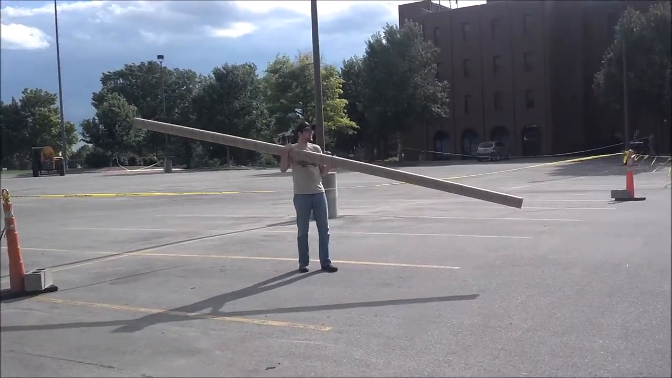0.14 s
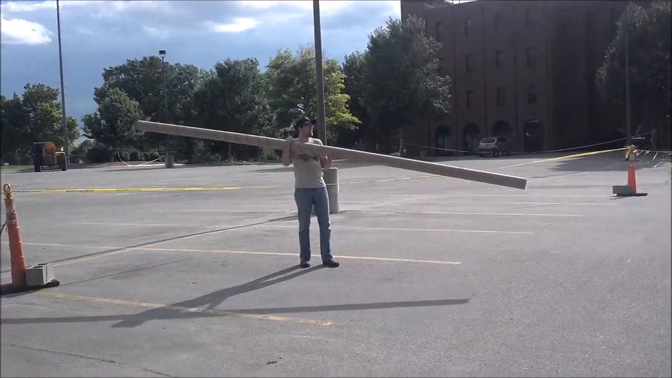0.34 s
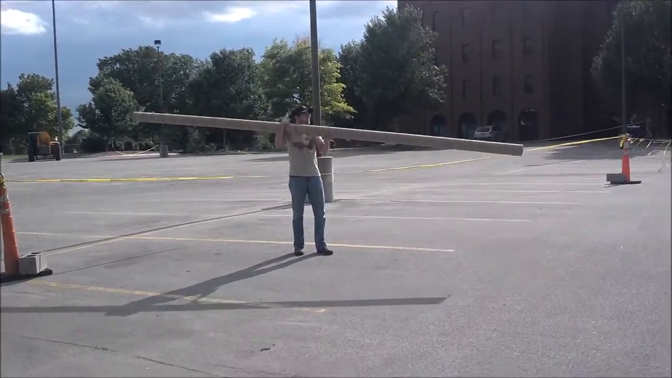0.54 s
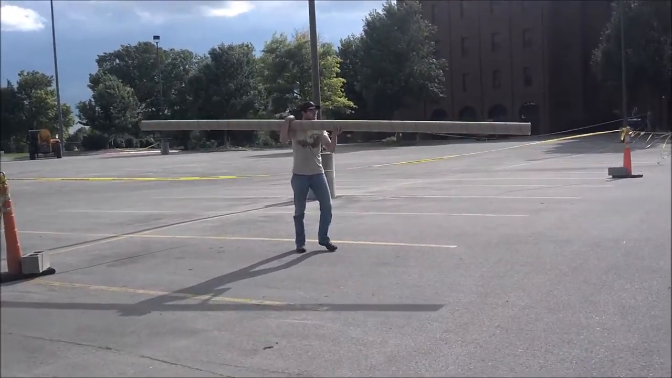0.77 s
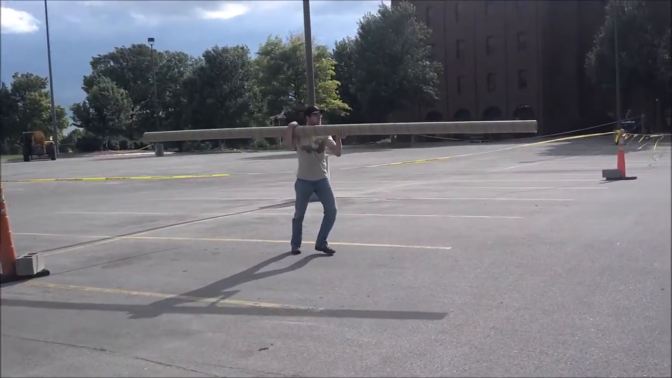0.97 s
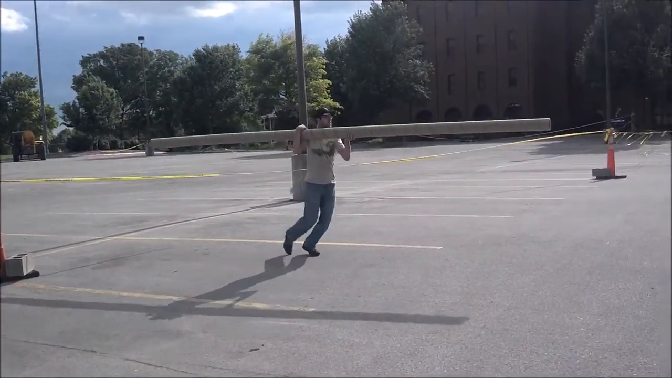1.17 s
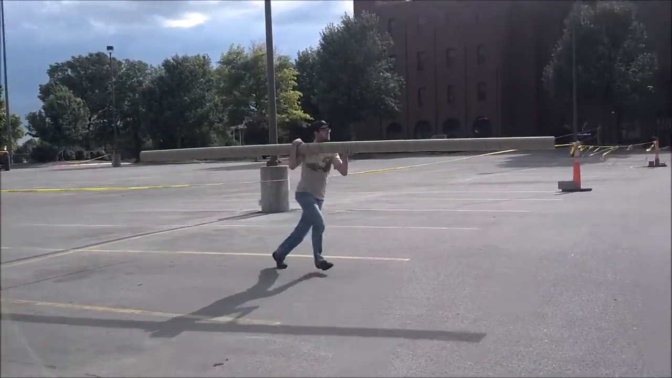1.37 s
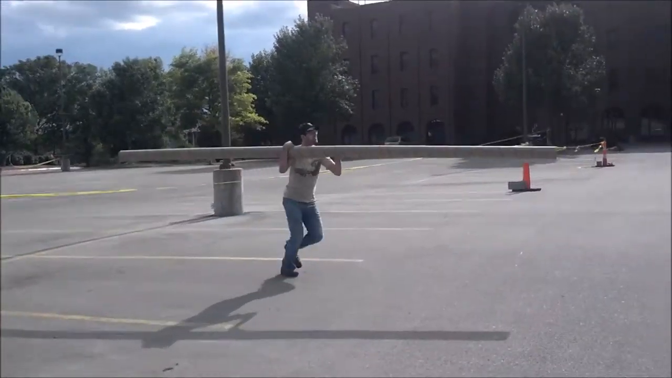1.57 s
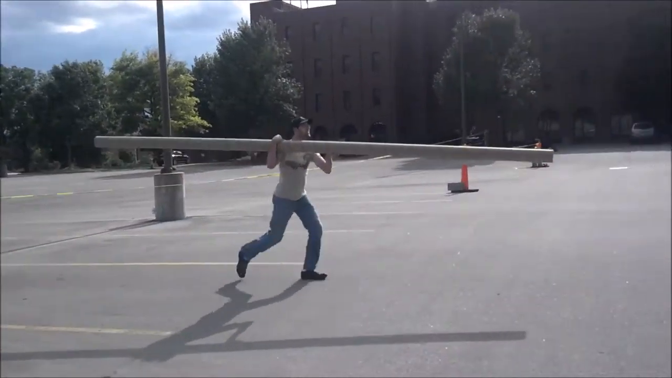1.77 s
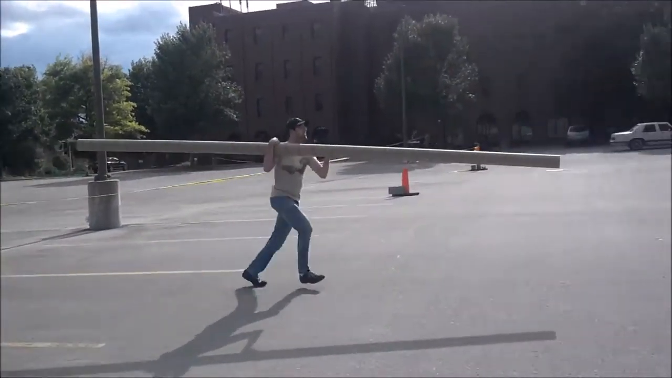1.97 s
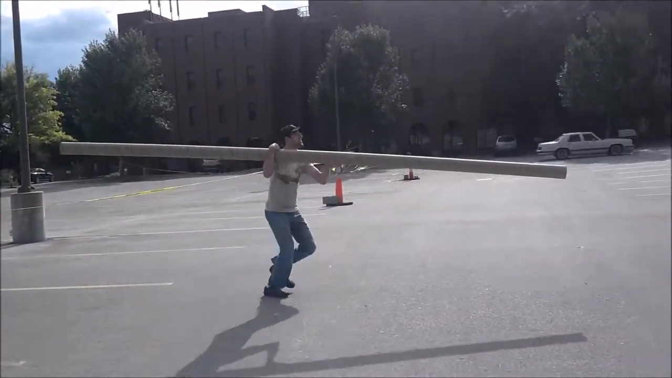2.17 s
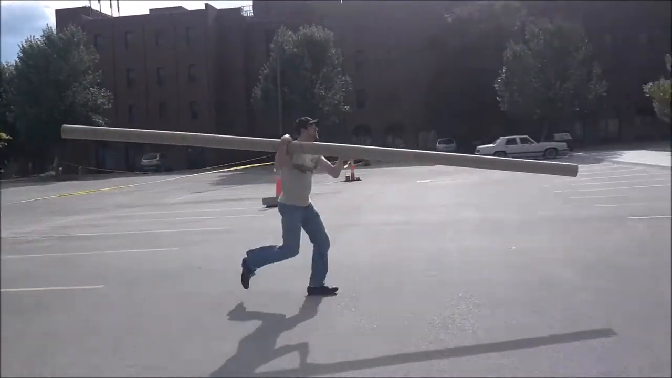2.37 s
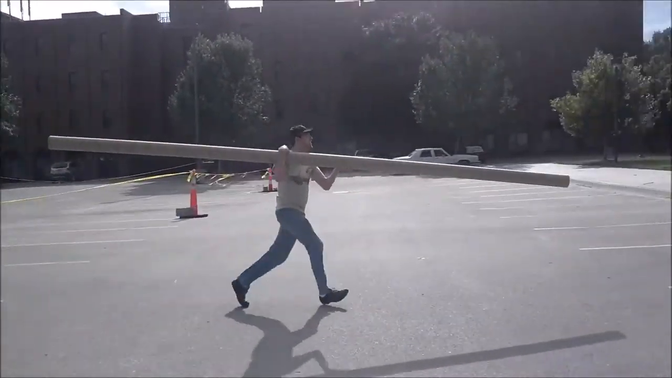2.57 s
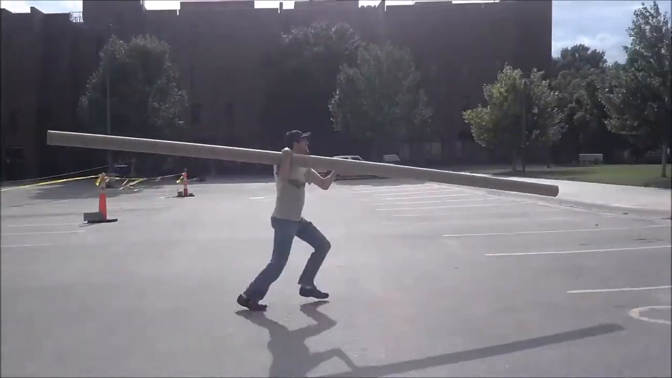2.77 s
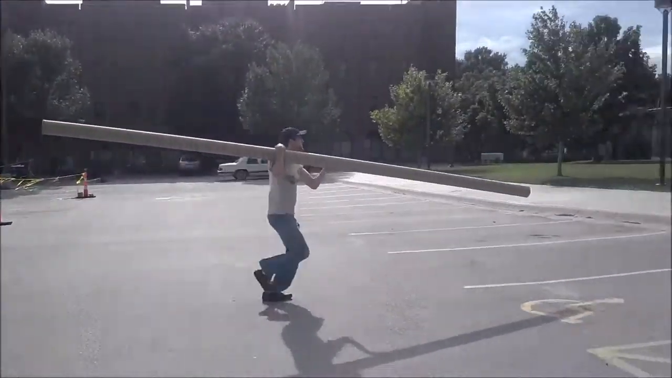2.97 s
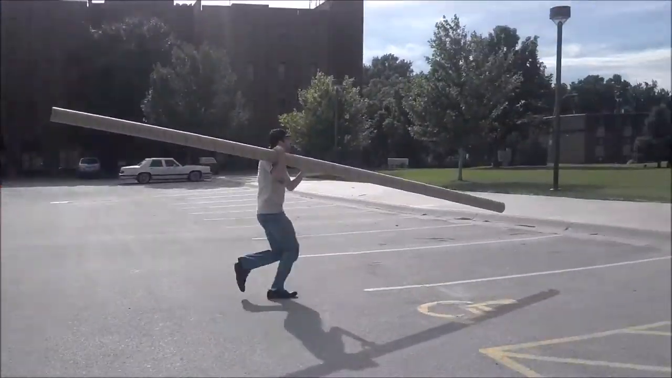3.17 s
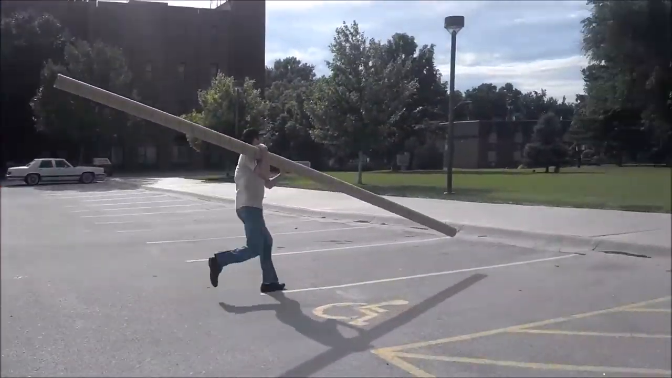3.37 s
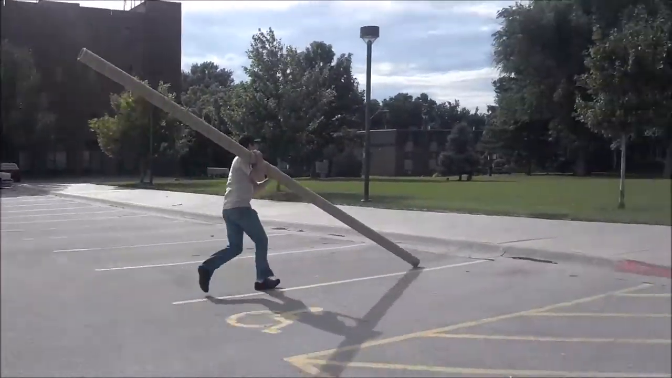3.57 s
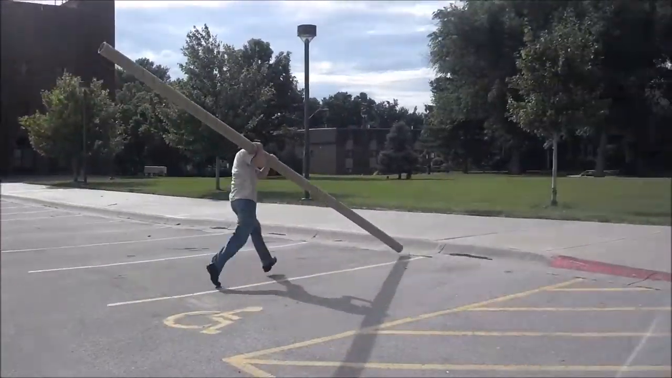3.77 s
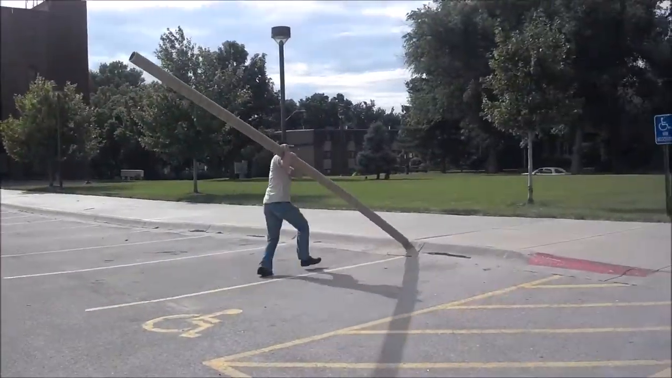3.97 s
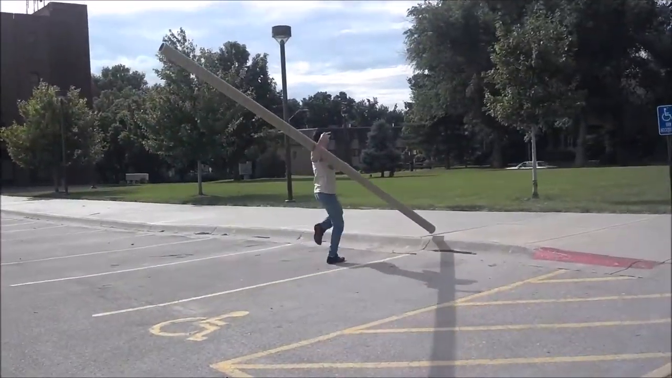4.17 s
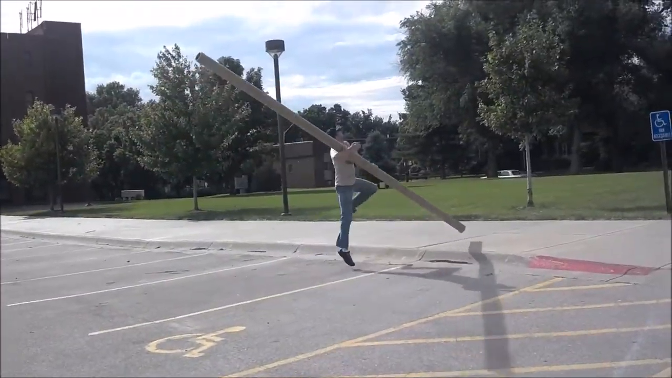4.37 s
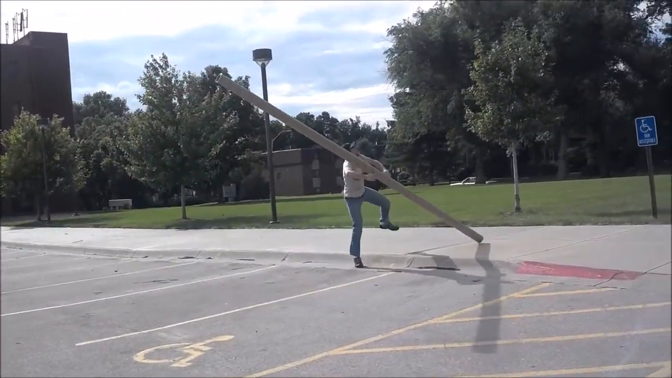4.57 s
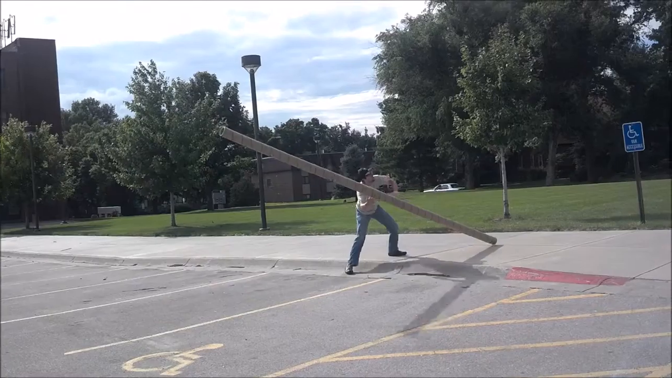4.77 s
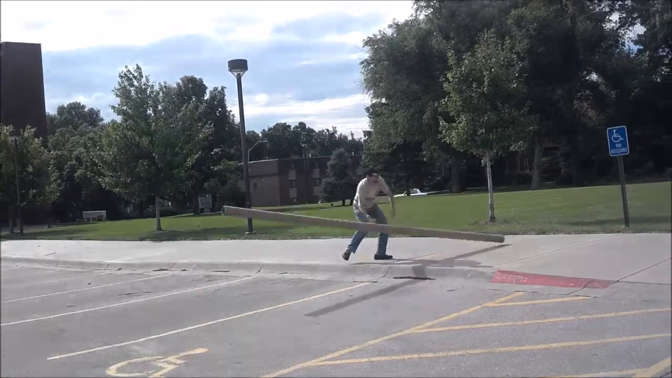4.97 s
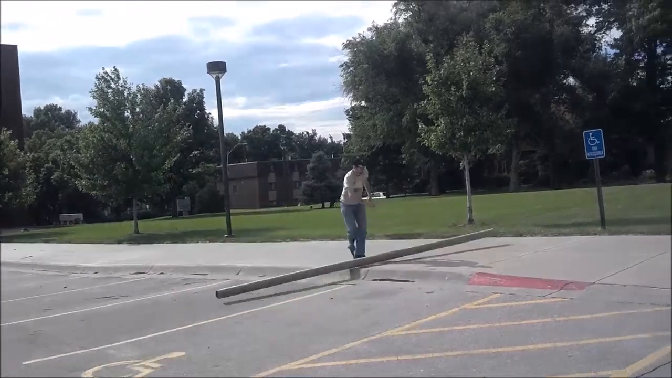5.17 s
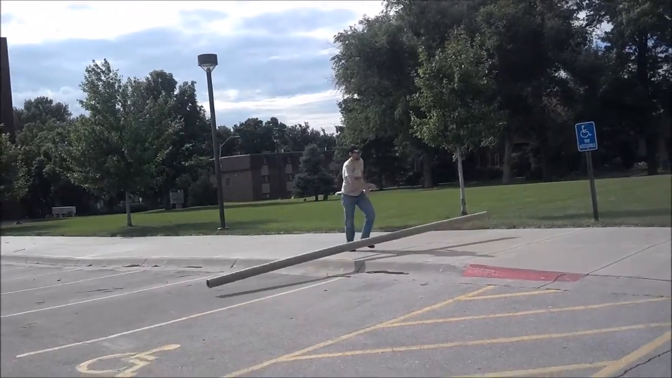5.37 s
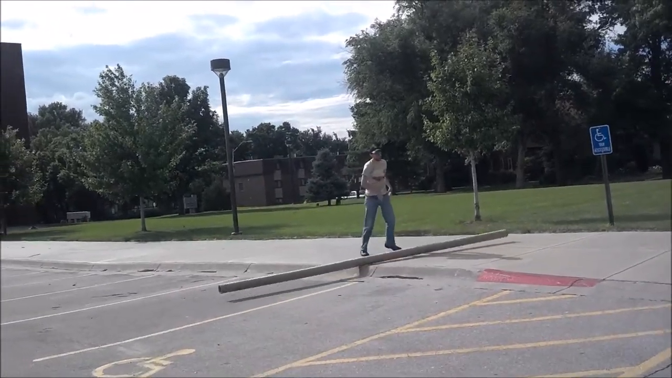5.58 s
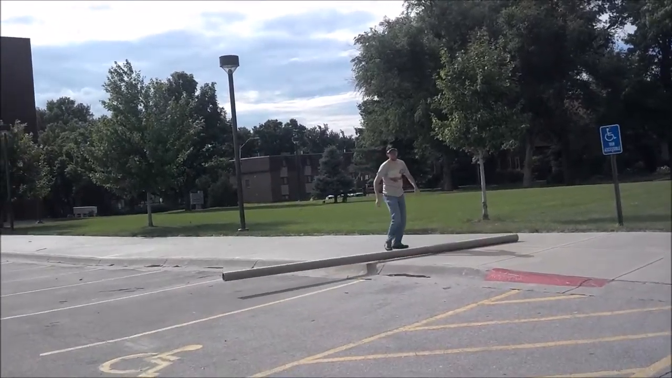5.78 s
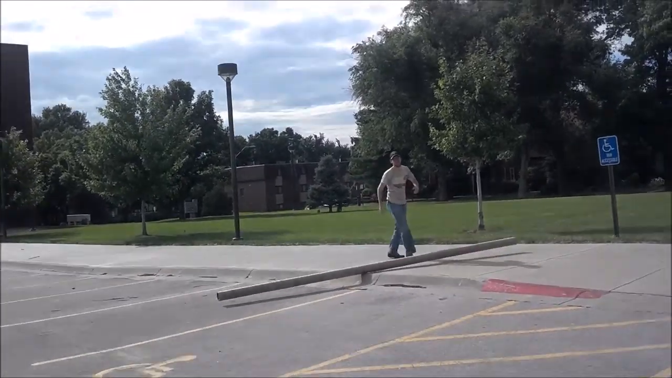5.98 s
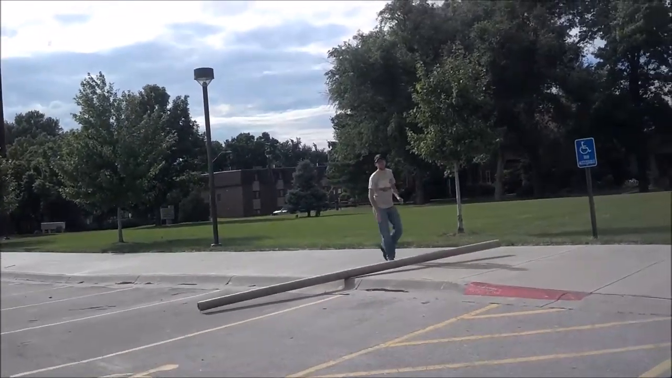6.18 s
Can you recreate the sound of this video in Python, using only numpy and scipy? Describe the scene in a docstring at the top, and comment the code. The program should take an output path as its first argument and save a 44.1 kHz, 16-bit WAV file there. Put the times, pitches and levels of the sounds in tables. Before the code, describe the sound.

A dry, open car park with wind on a stereo microphone: lumpy low rumble and soft thumps, often heavier on the right, over faint traffic, thin leaf hiss and barely audible bird chirps near 0.2, 0.8 and 2 s. At 1.0 s a bright snap clicks close on the left, and the background briefly dips. Faint gritty running steps follow around 1.6-1.8 s and 2.6-3.4 s, with strong wind buffets near 3.5 s. At 3.6 s the wooden pole tip stutters on asphalt, four quick hollow knocks with a short scrape; a hard clack lands at 3.95 s, smaller taps at 4.15 s. More skidding knocks come at 4.55 s and weaker ones at 4.8-4.9 s. Around 5.1 s it clatters into the loudest, clipped bang at 5.18 s. Rocking knocks at 5.7 and 5.84 s finish, with a gust near 6 s.

```python
"""Open car park, windy: a long wooden pole is carried past at a run and its tip skips and scrapes on the asphalt,
then it falls and rocks on a kerb. Wood is struck and dragged modes plus noise; shoes and ticks are noise puffs.
Gusts rumble on the two microphone ports, each on its own, over far traffic, leaf hiss and a faint bird.
The recorder steers the ports: each side subtracts a delayed copy of the other port."""
import sys
import numpy as np
from scipy import signal
from scipy.fft import rfft, irfft
from scipy.io import wavfile
from scipy.ndimage import map_coordinates

SR = 44100
rng = np.random.default_rng(int(sys.argv[2]) if len(sys.argv) > 2 else 0)


def store_pcm(level_fs):
    """Save levels as 16-bit WAV."""
    pcm = np.round(np.clip(level_fs, -1, 1) * 32767).astype(np.int16)
    wavfile.write(sys.argv[1], SR, np.atleast_2d(pcm).T)


N = 275095


def from_db(db):
    """Gain of a level in dB."""
    return 10 ** (np.asarray(db) / 20)


def rms_one(x):
    """Scaled to rms 1."""
    return x / np.sqrt(np.mean(x ** 2) + 1e-20)


def in_time(rows):
    """Columns of a curve, interpolated at every sample."""
    s, *columns = np.transpose(rows)
    return [np.interp(np.arange(N) / SR, s, column) for column in columns]


def band(x, low_hz, high_hz, order=2):
    """Butterworth band-pass; the upper edge is held below 0.45 SR."""
    return signal.sosfilt(signal.butter(order, [low_hz, min(high_hz, .45 * SR)], "band", fs=SR, output="sos"), x)


def drift(rate_hz):
    """Slow random wander of rms 1: noise through two equal low-pass poles at an eighth of the sample rate."""
    r = np.exp(-16 * np.pi * rate_hz / SR)
    noise = rng.standard_normal(N // 8 + 2002)
    slow = signal.lfilter([1], [1, -2 * r, r * r], noise)[2000:]  # the filter has settled by then
    return np.interp(np.arange(N) / 8, np.arange(len(slow)), rms_one(slow))


def ring(clicks, hz, t60):
    """Two-pole resonator: a unit click starts a sine of height near 1 that loses 60 dB in t60 seconds."""
    r, w = from_db(-60 / (t60 * SR)), 2 * np.pi * hz / SR
    return signal.lfilter([0, np.sin(w)], [1, -2 * r * np.cos(w), r * r], clicks + 1e-18)


def add(out, s, piece):
    """Mixes a short sound in at time s."""
    i = round(s * SR)
    out[i:i + len(piece)] += piece[:N - i]


def puff(t60, low_hz, high_hz, size=4000):
    """A dying burst of band noise, scaled by its bandwidth to a peak near 1."""
    dying = from_db(-60 * np.arange(size) / SR / t60)
    burst = band(rng.standard_normal(size) * dying, low_hz, high_hz)
    return burst / np.sqrt(8 * (high_hz - low_hz) / SR)


def coloured(spectrum, alike):
    """Noise at both ports with a given spectrum, the share alike of its power in common; rms 1."""
    hz, level_db = np.transpose(spectrum)
    log_hz = np.log(np.fft.rfftfreq(N, 1 / SR) + 1)
    shape = from_db(np.interp(log_hz, np.log(hz), level_db, -60, -60))
    shared, left, right = irfft(rfft(rng.standard_normal((3, N))) * shape, N)
    return rms_one(np.sqrt(alike) * shared + np.sqrt(1 - alike) * np.array([left, right]))


# Pole tip dragged on asphalt: (time [s], length [s], first level [dB], last level [dB],
#   grit relative [dB], upper modes relative [dB])
DRAGS = [(3.611, 0.032, -14.5, -27.5, -17, -11.5), (3.667, 0.042, -24.5, -36, -11.5, -10.5),
         (3.924, 0.026, -31.5, -33.5, -4, 3), (3.95, 0.0099, -29.5, -17.5, -6.5, -5.5),
         (4.016, 0.018, -41, -37, -11.5, -18), (4.147, 0.0064, -22, -46, -12.5, 0),
         (4.172, 0.0053, -29, -29, -26, -7.5), (4.542, 0.031, -33.5, -34.5, -4, 5.5),
         (4.596, 0.039, -26.5, -45.5, -9, -1), (4.788, 0.0056, -41, -52, -30, -2),
         (4.852, 0.031, -29.5, -44, -3, 4.5), (4.91, 0.076, -34.5, -49, -3, -4),
         (5.105, 0.073, -34, -31, -7, -9), (5.198, .025, -25, -38.5, -29, -23),
         (5.565, 0.018, -48.5, -38, -26, -25)]
LAND_DB_PER_S, LIFT_DB_PER_S = 3507, 1098  # how fast a skid starts and dies away
GRIT_FOLLOWS = 0.61  # share of a skid's fade that the grit follows


def skid_gains():
    """Gains of lower modes, upper modes and grit: each skid lands, drags and lifts; the tip bites unevenly."""
    gains, t = np.zeros((3, N)), np.arange(N) / SR
    for s, length_s, first_db, last_db, grit_db, upper_db in DRAGS:
        fade_db = np.interp(t, [s, s + length_s], [0, last_db - first_db])
        landing_db = LAND_DB_PER_S * np.maximum(s - t, 0)
        lifting_db = LIFT_DB_PER_S * np.maximum(t - s - length_s, 0)
        layers_db = [fade_db, fade_db + upper_db, GRIT_FOLLOWS * fade_db + grit_db]
        gains += from_db(first_db - landing_db - lifting_db + layers_db)
    return from_db(2.6 * drift(98) - 1.0) * gains


# Modes of the wooden pole: (frequency [Hz], level [dB], ring time to -60 dB [s])
POLE_MODES = [(331, -6, 0.054), (570, -9, 0.022), (719, -1, 0.036), (882, -3, 0.05), (970, -0.5, 0.04),
              (1080, 1.5, .035), (1157, -1, .035), (1274, -2, 0.03), (1450, -6, 0.012), (1813, -2, 0.018),
              (1965, 0.5, 0.02), (2323, -1.5, 0.013), (2685, -1.5, 0.015), (3650, -9, .014)]
CATCHES_PER_S, CATCH_SPREAD_DB = 600, 5


def skids(lower_gain, upper_gain):
    """Uneven catches of the tip ring the pole's modes; each catch strikes every mode differently."""
    body = np.zeros((2, N))
    caught = rng.random(N) < CATCHES_PER_S / SR
    catches = caught * from_db(CATCH_SPREAD_DB * np.minimum(rng.exponential(1, N), 3))
    for hz, level_db, t60 in POLE_MODES:
        mode = rms_one(ring(catches * rng.standard_normal(N), hz, t60))
        body[int(hz > 1500)] += from_db(.3 * level_db) * mode  # dragging evens out the mode levels
    lower, upper = rms_one(body[0]), rms_one(body[1])
    return lower_gain * from_db(-10.5) * lower + upper_gain * from_db(3.5) * upper


def grit(gain):
    """Crushed grains along the stroke: random clicks in two bands; each port hears its own crackle."""
    sizes = from_db(2.5 * np.minimum(rng.exponential(1, (2, N)), 5))
    grains = rng.standard_normal((2, N)) * sizes * (rng.random((2, N)) < 9000 / SR)  # 9000 per second
    middle = rms_one(band(grains, 2900, 4600, order=1))
    top = rms_one(band(grains, 5600, 24000))
    return gain * from_db(-2.5) * rms_one(middle + from_db(-7.0) * top)


# Blows on the pole: (time [s], level [dB], crack relative [dB], ring relative [dB], tilt [dB per octave])
BLOWS = [(3.612, -12.5, -16, -18, 2.5), (3.639, -10.5, -16.5, -21, -2.5), (3.668, -13, -24, -35, -0.5),
         (3.7, -13, -23, -23.5, 1), (3.923, -17, -13, -36, -1), (3.949, -0.5, -34, -58, -1),
         (3.956, -14, -30, -28, 1.5), (3.962, -10.5, -22, -11.5, 4), (4.032, -30.5, -8, -11, -2.5),
         (4.144, -18, -27, -33, 0), (4.177, -15, -19, -28, -1), (4.541, -13.5, -14, -17, -0.5),
         (4.571, -17.5, -14, -14.5, -2), (4.601, -19.5, -15, -10.5, -2), (4.788, -30.5, -33, -11.5, -13),
         (4.853, -19, -25, -19, 0), (4.911, -26.5, -15, -11.5, -2), (5.108, -18, -9.5, -28, 4.5),
         (5.142, -16, -13.5, -27.5, -6), (5.163, -14.5, -18.5, -16.5, -2), (5.181, 5, -16, -22, 1),
         (5.193, -30, -28, -30, -13), (5.212, -18, -18.5, -14.5, -2), (5.57, -38.5, -21, -10.5, -11.5),
         (5.631, -30.5, -37, -11.5, -8.5), (5.683, -10.5, -15.5, -12.5, 3), (5.755, -21, -29, -16, -1),
         (5.839, -9, -47, -23.5, -2.5)]


def knocks():
    """Each blow: a short thud, a low thump, a rattle and the modes, each struck with its own strength."""
    out, click = np.zeros(N), np.eye(1, 4000)[0]
    spread_db = rng.normal(0, 2.5, (len(BLOWS), len(POLE_MODES)))
    detune = rng.normal(1, .025, spread_db.shape)  # the grip on the ground shifts each mode a little
    t = np.arange(4000) / SR
    for (s, level_db, _, ring_db, tilt_db), own_db, shift in zip(BLOWS, spread_db, detune):
        thud_hz = 1250 * from_db(0.62 * tilt_db)  # softer contact, lower thud
        thud = np.sin(2 * np.pi * thud_hz * t) * np.exp(-((t - .0012) / 0.0025) ** 2)
        thump = puff(0.07, 120, 520)  # low weight of the blow
        modes = np.zeros(4000)
        for k, (hz, mode_db, t60) in enumerate(POLE_MODES):
            strength = from_db(mode_db + own_db[k] + tilt_db * np.log2(hz / 1000))
            modes += (-1) ** k * strength * ring(click, hz * shift[k], t60)
        rattle = from_db(-6.5 + tilt_db) * puff(0.06, 500, 1940)  # the pole chatters on loose stones
        blow = from_db(-14.0) * thud + from_db(-22.5) * thump + from_db(ring_db) * (modes + rattle)
        add(out, s, from_db(level_db) * blow)
    return out


def cracks():
    """The bright edge of each blow, two noise puffs scattered differently to each port."""
    out = np.zeros((2, N))
    for s, level_db, crack_db, _, _ in BLOWS:
        for port in out:
            crack = puff(.011, 2800, 5500) + from_db(-6) * puff(.007, 6000, 16500)
            add(port, s + .0007, from_db(level_db + crack_db) * crack)
    return out


# Shoes on grit: (time [s], level [dB], decay to -60 dB [s], treble relative [dB])
FOOTFALLS = [(1.084, -47.5, 0.11, -19), (1.636, -34, 0.015, -20), (1.7417, -35, 0.016, -11),
             (1.786, -52, 0.084, 8), (1.8273, -29, 0.027, -25), (2.6419, -24, 0.01, -31),
             (2.672, -26, 0.017, -20), (2.873, -43, 0.073, -12), (3.1468, -38.5, 0.12, -9),
             (3.1672, -26, 0.022, -18), (3.1777, -35, 0.085, -7), (3.21, -43, .03, 3),
             (3.2844, -35, 0.021, -10), (3.4216, -23.5, 0.021, -22)]


def steps():
    """Short gritty puffs of noise, a middle band and a treble band."""
    out = np.zeros(N)
    for s, level_db, t60, treble_db in FOOTFALLS:
        step = puff(t60, 660, 2160) + from_db(treble_db) * puff(t60, 2500, 23000)
        add(out, s, from_db(level_db - 7.5) * step)
    return out


# A snap close to the left port: (time [s], level [dB])
NEAR_SNAPS = [(1.0045, -8.5), (1.0038, -33)]


def snap():
    """A bright double tick of three noise bands, weaker and a few samples earlier at the right port."""
    near = np.zeros(N)
    for s, level_db in NEAR_SNAPS:
        tick = from_db(-11.5) * puff(0.0083, 900, 1800) + puff(0.0082, 2600, 5000)
        tick += from_db(-2.0) * puff(0.0082, 3700, 22500)
        add(near, s, from_db(level_db) * tick)
    return np.array([near, from_db(-9) * np.roll(near, -5)])


# Faint treble ticks at the right port: (time [s], level [dB])
FAINT_TICKS = [(2.182, -40), (2.357, -47), (5.5448, -51), (5.6311, -51), (5.9595, -49), (5.9888, -54.5),
               (6.053, -50)]


def ticks():
    """Tiny puffs of treble noise, at the right port only."""
    out = np.zeros((2, N))
    for s, level_db in FAINT_TICKS:
        add(out[1], s, from_db(level_db - 2) * puff(0.0087, 8000, 14000))
    return out


# Direction of pole, shoes and bird: (time [s], delay at the right port [ms])
DIRECTION = [(0, 0.11), (3.6, 0.14), (4.5, 0.14), (5.2, 0.1), (5.6, .03), (6.24, 0.027)]


def open_air(x):
    """Direct sound reaches the right port later; far walls scatter a faint tail, different at each port."""
    late_ms, = in_time(DIRECTION)
    right = map_coordinates(x, [np.arange(N) - late_ms * SR / 1000], order=3)
    tails = [from_db(-60) * puff(.25, 400, 5000, size=12000) for port in "LR"]
    return np.array([x, right]) + [signal.fftconvolve(x, tail)[:N] for tail in tails]


# Dips of the far sound: (time [s], depth [dB])
FAR_DIPS = [(1.009, 11.5), (3.017, 5.5), (5.252, 6.5)]


def dips():
    """Loss in dB over time: the level drops at once and creeps back exponentially."""
    t = np.arange(N) / SR
    recovery_s = 0.56
    return sum(depth_db * (t > s) * np.exp(-np.abs(t - s) / recovery_s) for s, depth_db in FAR_DIPS)


# Strength of the wind on the microphone: (time [s], right port level [dB], left port relative [dB])
GUSTS = [(0, -27.5, 2.5), (.3, -23, -4.5), (.4, -19, -16), (.53, -26.5, 4), (.61, -45, -18),
         (.69, -36, 10.5), (.82, -28, -4), (.96, -24, -6.5), (1.06, -43.5, -7), (1.14, -32, -6.5),
         (1.58, -42, 7.5), (1.8, -21, -8), (2.2, -21, -5.5), (2.215, -30.5, 4), (2.28, -34.5, 2.5),
         (2.535, -28, -3), (2.56, -19.5, -31), (2.72, -21.5, -23), (2.79, -45, 11.5), (2.94, -27.5, 1.5),
         (3.0, -18, -19), (3.06, -32.5, -3), (3.3, -43, -9), (3.45, -17, -31), (3.55, -21.5, -25),
         (3.83, -23, -15), (4.05, -65, 3), (4.13, -47, 7), (4.2, -19, -35), (4.45, -42, 5), (4.6, -33, -11),
         (4.68, -56, 13), (4.93, -28, -12), (5.06, -48, 11.5), (5.19, -38.5, 2), (5.25, -69, -3),
         (5.5, -42.5, -4), (5.63, -52.5, -7), (5.86, -23.5, -31), (5.92, -31, -20), (6.02, -18, -26),
         (6.11, -28, -26), (6.16, -44.5, -5), (6.24, -50.5, 5)]
# Single buffets on the right port: (time [s], level [dB], length [ms])
PORT_BUFFETS = [(0.392, -10, 0.78), (0.442, -11.5, 2.3), (1.582, -24, 1.4), (1.952, -12.5, 0.72),
                (2.084, -14, 1.26), (2.224, -26, 0.74), (2.672, -8.5, 1.3), (4.921, -26, 1.8),
                (3.012, -18, 1.1), (3.466, -4.5, 0.94), (3.49, -8, 1.5), (3.546, -19, 1.8),
                (6.03, -13.5, 0.57)]
BUFFET_HZ = 318
BASS_DIP_SHARE = 0.5  # the wind's bass dips along with the far sound


def wind():
    """Lumpy low noise, unrelated at the two ports; the stronger the gust, the higher its eddies reach."""
    ports, (right_db, left_db) = [], in_time(GUSTS)
    for level_db in (right_db + left_db, right_db):
        lumps_db = 3.3 * np.minimum(drift(30), 1.5)
        low = rms_one(band(rng.standard_normal(N) * from_db(lumps_db), 95.0, 168.4))
        edge = band(rng.standard_normal(N) * from_db(2.7 * lumps_db), 180, 331.5)
        edge = rms_one(band(edge, 91, 620))
        edge_db = -5 + 0.34 * (level_db + 18)
        gust = from_db(-BASS_DIP_SHARE * dips()) * low + from_db(edge_db) * edge
        ports.append(from_db(level_db + 1.77 * drift(10.6)) * gust)
    t = np.arange(800) / SR - .004
    for s, level_db, length_ms in PORT_BUFFETS:
        swing = np.sin(2 * np.pi * BUFFET_HZ * (t + .004))
        eddy = swing * np.exp(-(t * 1000 / length_ms) ** 2)
        add(ports[1], s - .003, from_db(level_db) * eddy)
    return signal.sosfilt(signal.butter(2, 85, "high", fs=SR, output="sos"), ports)


# A far bird: (time [s], first pitch [Hz], last pitch [Hz], level [dB])
BIRD_CALLS = [(.163, 3330, 3780, -54), (.8, 3200, 3500, -58), (2.008, 3320, 3420, -56)]


def bird():
    """Short rising whistles: a gliding sine under a half-sine swell, 21 ms each."""
    out, share = np.zeros(N), np.linspace(0, 1, int(0.021 * SR))
    for s, first_hz, last_hz, level_db in BIRD_CALLS:
        phase = 2 * np.pi * np.cumsum(first_hz + (last_hz - first_hz) * share) / SR
        add(out, s, from_db(level_db) * np.sin(np.pi * share) * np.sin(phase))
    return out


# Far traffic and leaves, before flicker and dips: (time [s], low layer level [dB], high layer level [dB])
FAR_LEVELS = [(0, -43.5, -60.5), (.4, -46, -60.5), (.62, -48, -68), (1, -44.5, -58.5), (1.3, -49, -69.5),
              (1.85, -58, -62), (2.35, -56.5, -69), (2.7, -50, -59), (3.0, -47, -65), (3.5, -47, -62.5),
              (3.9, -46, -64.5), (4.16, -43, -57.5), (4.5, -49, -68), (4.73, -40.5, -55.5),
              (5.15, -42, -58.5), (5.6, -45.5, -73.5), (5.8, -43, -68), (6.24, -49, -73)]
# Spectrum of the far traffic: (frequency [Hz], level [dB per Hz])
TRAFFIC_SPECTRUM = [(20, 6), (60, 4.5), (200, 0), (500, -11.5), (1000, -17), (2000, -30.5), (3500, -31.5)]
# Spectrum of the hiss: (frequency [Hz], level [dB per Hz])
HISS_SPECTRUM = [(1200, 3), (2500, 1), (4000, -1), (6000, -7), (9000, -12.5), (13000, -9.5), (15700, -5)]


def background():
    """Far traffic rumble, largely shared by the ports, and leaf hiss, almost unrelated; both flicker."""
    low_db, high_db = in_time(FAR_LEVELS)
    rumble = from_db(low_db + 2.2 * drift(9)) * coloured(TRAFFIC_SPECTRUM, alike=0.66)
    hiss = from_db(high_db + 1.1 * drift(42)) * coloured(HISS_SPECTRUM, alike=0.014)
    return from_db(-dips()) * (rumble + hiss)


def scene():
    """Pressure at the left and right port."""
    lower_gain, upper_gain, grit_gain = skid_gains()
    through_air = open_air(skids(lower_gain, upper_gain) + knocks() + steps() + bird())
    pole_edges = grit(grit_gain) + cracks()
    return through_air + pole_edges + snap() + ticks() + wind() + background()


STEER_SAMPLES, STEER_SHARE = 16, .985  # delay and share of the other port that is subtracted
CUTOFF_HZ = 17000  # from here up the low-pass holds 95 dB of loss


def record(dry):
    """Each side loses a delayed copy of the other port; peaks clip, the top is cut."""
    delayed = np.pad(dry[::-1], ((0, 0), (STEER_SAMPLES, 0)))[:, :N]
    steered = np.clip(dry - STEER_SHARE * delayed, -1, 1)
    return signal.sosfilt(signal.cheby2(16, 95, CUTOFF_HZ, fs=SR, output="sos"), steered)


dry = scene()
out = record(dry)
store_pcm(out)
```